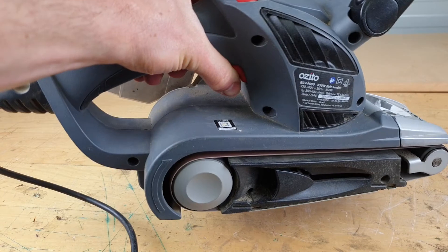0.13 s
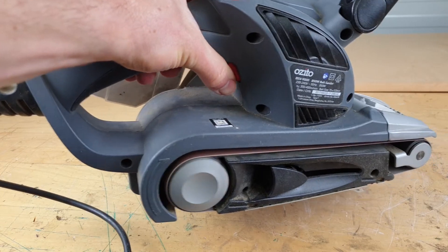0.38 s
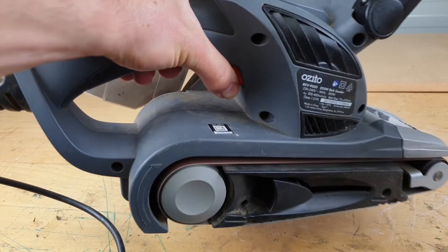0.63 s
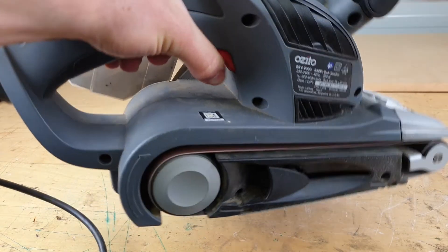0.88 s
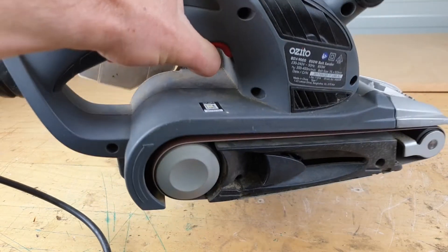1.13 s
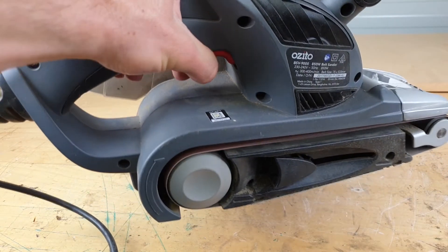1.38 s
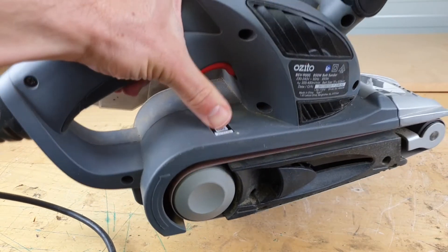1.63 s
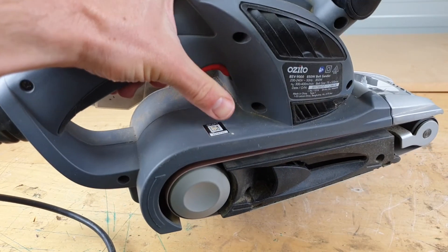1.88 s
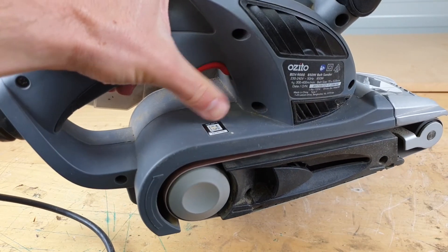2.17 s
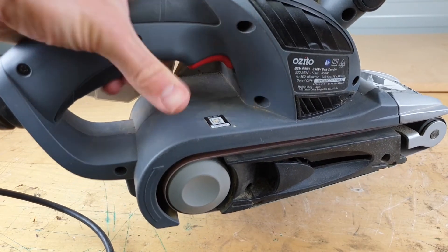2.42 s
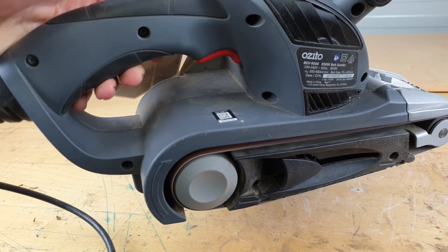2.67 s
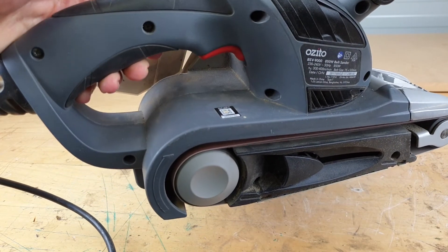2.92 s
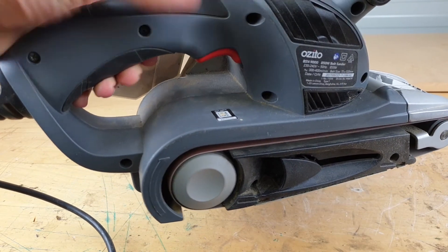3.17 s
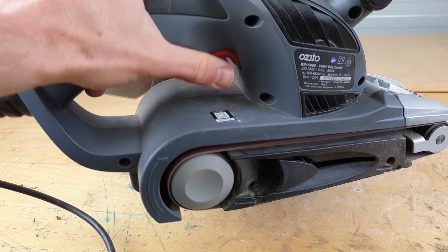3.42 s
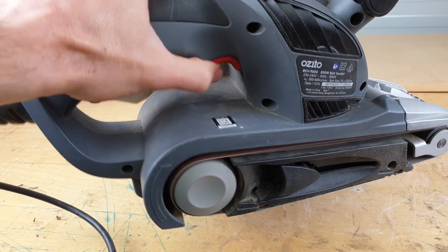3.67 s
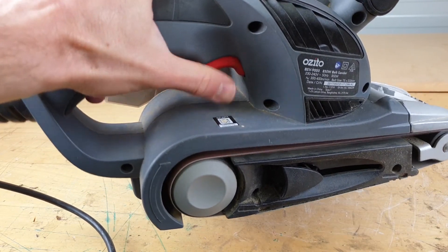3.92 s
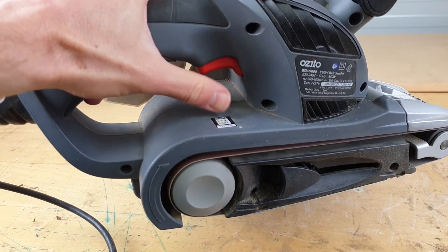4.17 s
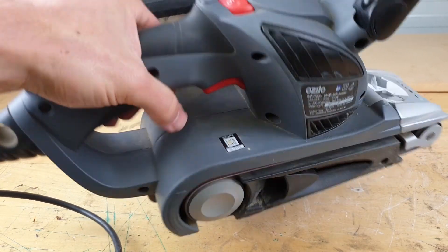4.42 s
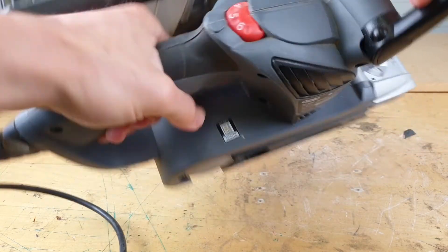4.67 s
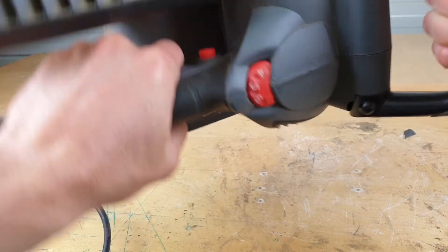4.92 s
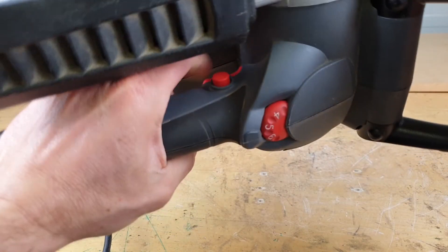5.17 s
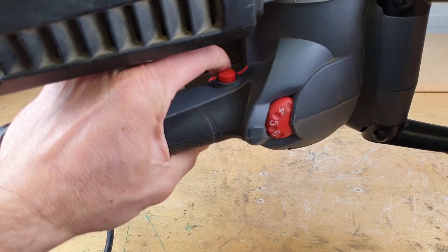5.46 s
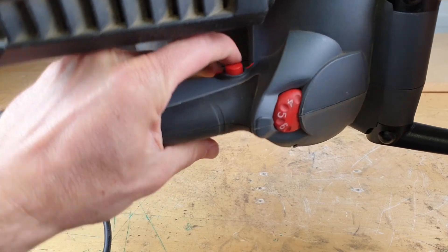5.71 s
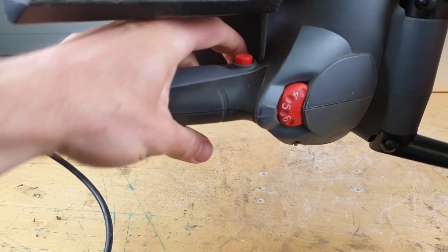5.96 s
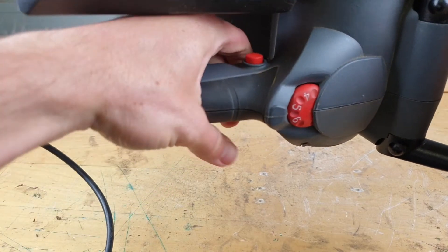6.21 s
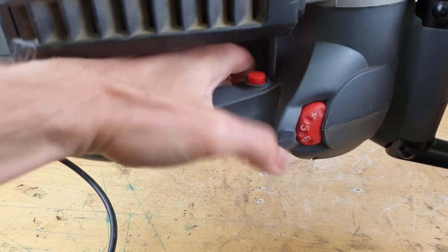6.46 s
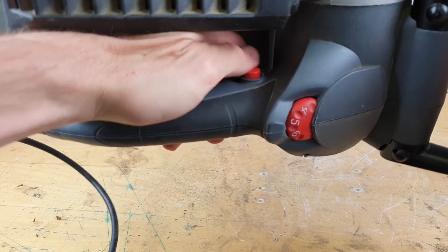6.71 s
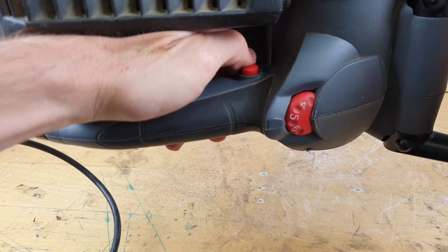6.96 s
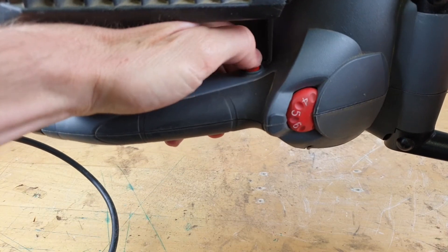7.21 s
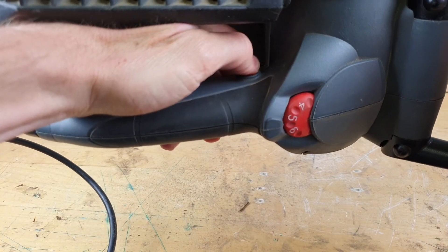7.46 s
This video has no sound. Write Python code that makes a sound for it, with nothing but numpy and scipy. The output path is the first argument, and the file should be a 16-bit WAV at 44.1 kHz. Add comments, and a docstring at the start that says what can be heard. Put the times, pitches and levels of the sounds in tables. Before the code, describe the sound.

A handheld electric belt sander close to the microphone in a quiet workshop. It is already coasting down, rattling lower, with plastic clicks before the trigger restarts it. The motor surges into a bright whine with rushing fan and fluttering belt scrape, runs steadily, then is released and slows to a rattling stop as it is turned over. After a tiny pause it clicks on and whirs up again, brighter and hissier.

```python
"""In a workshop, a belt sander held close to one microphone coasts down, is switched on, is turned over while it
coasts to a stop, and is switched on again. The rotor speed drives it all: a family of sine whines locked to the
turning rotor, filtered noise for bearings and gears rattling in the plastic housing and for the rushing fan, and
a resonant scrape that swells once a lap at the belt joint. Clicks, coil hum and faint room tone complete it."""
import sys
import numpy as np
from scipy import signal
from scipy.fft import rfft, irfft, next_fast_len
from scipy.io import wavfile
from scipy.ndimage import uniform_filter1d

SR = 44100
rng = np.random.default_rng(int(sys.argv[2]) if len(sys.argv) > 2 else 0)


def inscribe(sig):
    """Save sig as 16-bit PCM at rate SR to the path in sys.argv[1].

    A 1-D sig is mono; a 2-D sig holds one channel per row.
    Samples are clipped to [-1, 1] before scaling.
    """
    pcm = np.round(np.clip(np.atleast_2d(sig).T, -1, 1) * 32767)
    wavfile.write(sys.argv[1], SR, pcm.astype(np.int16))


def amplitude_ratio(level_db):
    """Convert a level in decibels to the matching linear amplitude (field) ratio."""
    exponent = np.asarray(level_db, float) / 20
    return 10 ** exponent


N = 334719

FULL_SPEED = 525  # rotor turns per s
# when current flows: on_s, off_s
SWITCHED_ON = [(1.098, 3.93), (6.217, 9)]
# the tool is rolled over: from_s, to_s
ROLL_OVER = (4.2, 5.75)
# coasting: start_s, speed_turns_per_s, bearing_friction_turns_per_s2, air_drag_per_turn
COASTS = [(0, 285, 171.4, .00114), (3.914, 524.4, 166, .00116)]
# spinning up: start_s, top_turns_per_s, initial_turns_per_s, quick_share, quick_s, slow_s (time constants)
SPIN_UPS = [(1.098, 524.5, 65, .409, .0369, .1967), (6.2166, 529.2, 0, .475, .0556, .2024)]

# whines of unbalance and magnetic pull, drive pulley teeth, fan blades and gear mesh: cycles_per_rotor_turn,
# waver_db, waver_s, speed_power (exponent that the level follows)
WHINES = [(1, .6, .03, 1.5), (2, 2, .05, 2), (4, 1.8, .2, 6), (12, 3, .02, 1.6), (10, 2.5, .008, .25),
          (20, 3, .02, 0), (32, 3, .015, 1.4), (2.92, 3, .03, .9), (5.84, 3, .03, .7), (8.75, 2.5, .03, 3),
          (2.38, 4, .02, 0)]
# levels at full speed ahead of the covers, one row per whine:
# powered_on_side_db, powered_turned_over_db, coasting_db, added_at_full_pull_db
WHINE_LEVELS = [(-59.5, -57, -60, 0), (-66, -66, -62, 10), (-62, -74, -76, 0), (-68, -62, -90, 29),
                (-54, -58, -56.5, -5), (-76, -62, -72, -10), (-59, -52, -56, 0), (-71, -68, -64, 28),
                (-66, -64, -66, 0), (-65, -68, -85, 0), (-74, -69, -90, 0)]
# how well the covers radiate a whine: centre_hz, width_hz, lift_db
COVERS = [(150, 200, -25), (290, 50, 10), (525, 60, 7), (640, 60, -6), (800, 200, -2), (1060, 90, 4),
          (1220, 170, 9), (1750, 200, 10), (2110, 120, 5), (2780, 350, 6), (3300, 200, 6), (3800, 200, 4),
          (4250, 250, 8), (4600, 150, -2), (5240, 500, 1), (6600, 1200, 2), (14000, 6000, 2)]
# unloaded teeth make and lose contact: level swing, its pace, and extra phase wander in radians
COAST_PATCHY_DB, COAST_PATCH_S, COAST_SMEAR = 2.5, .07, .25

# relative noise colours ahead of the housing resonances, fast on the side, fast turned over, slow:
# frequency_hz, density_db
COLOUR_FAST_SIDE = [(18, -69), (30, -44), (203, -21), (456, -12.5), (520, -10.5), (592, -12), (1050, -7.5),
                    (1920, -8), (3160, -5), (4810, -7.5), (5340, -6), (11400, -10.5), (15600, -17)]
COLOUR_FAST_TURNED = [(18, -59), (30, -32), (468, -13.5), (520, -16), (592, -11.5), (1270, -7),
                      (2030, -6.5), (3510, -3), (4930, -4.5), (5770, -1), (8110, 2.5), (10500, 4),
                      (15600, 0)]
COLOUR_SLOW = [(18, -58), (30, -30), (308, -8.5), (493, -0.5), (770, 2.5), (949, 2.5), (1050, 4.5),
               (2370, -2), (3160, -3.5), (3510, -4.5), (4220, -2), (9240, -16), (15600, -27)]
# housing resonances: centre_hz, width_hz, on_side_db, turned_over_db
HOUSING = [(100, 25, 5, 2), (140, 25, 4, 3), (200, 30, 8, 5), (760, 80, 4, 3), (1060, 80, 3, 2),
           (1240, 110, 4, 4), (1375, 50, 4, 1), (1780, 90, 4, 4), (3070, 200, 3, 4), (3600, 250, 1, 4),
           (4300, 400, 2, 1), (6350, 400, 1, 3), (8720, 300, 0, 4), (9570, 400, 0, 4), (10500, 300, 1, 5)]
# base noise levels while coasting: speed_turns_per_s, housing_rattle_db, fan_hiss_db
NOISE_BY_SPEED = [(0, -100, -104), (8, -80.5, -95), (38, -65, -77.5), (109, -57, -71), (190, -53, -59),
                  (281, -49, -53.5), (392, -44, -48), (500, -41.5, -43)]
# added by the inrush of current at rest, shrinking towards full speed: rattle_db, hiss_db
NOISE_PULL = (2.5, 3)
# added once the vents face the microphone: rattle_db, hiss_db
NOISE_TURNED = (2.5, 4.5)
RING_DOWN_DB_PER_S = 106  # the noise cannot die faster than the workshop rings

# belt on the platen, facing us: centre_hz, width_hz, level_db
SCRAPE_FACING = [(6250, 1830, -3), (7570, 650, 0.5), (9200, 810, -9.5), (11500, 850, -8),
                 (13700, 1600, -19.5)]
# the same heard from behind: centre_hz, width_hz, level_db
SCRAPE_BEHIND = [(4300, 1300, -4), (6500, 1000, 1.5), (8900, 2400, -2), (12500, 3700, -14)]
# scrape as the joint passes: speed_turns_per_s, level_db
SCRAPE_BY_SPEED = [(0, -100), (25, -71.5), (60, -59.5), (110, -55), (170, -52), (290, -50), (525, -50.5)]
# the belt side swings away from the microphone: from_s, to_s
BELT_SWINGS_AWAY = (4.2, 5)
TURNS_PER_LAP, FIRST_PASS_TURNS = 39.37, 1.5  # rotor turns
# drop between passes, how broad each pass is, and level once swung away
LAP_DEPTH_DB, PASS_BREADTH, SCRAPE_BEHIND_DB = 14.5, 2.4, -5.5

ROOM_TONE_DB = -104
# trigger and belt clicks: start_s, level_db, ring_hz, ring_t60_s, crack_over_ring_db (ahead of its filter)
CLICKS = [(.746, -43, 1260, .05, -18), (.979, -51, 830, 0.057, -40), (1.096, -43, 1470, 0.051, -12),
          (4.853, -56, 2200, .02, 5), (5.756, -50.5, 1047, 0.16, -40), (5.858, -52, 757, 0.12, -40),
          (6.156, -80, 1350, .02, -10), (6.192, -78, 780, .02, 9), (6.216, -55, 780, 0.022, 0.5)]
# the field coils hum at twice the mains: pitch_hz, level_db, added_at_full_pull_db
COIL_HUM = [(101, -86, 14), (199.5, -85, 18)]


def evened(x):
    """Scales to rms 1."""
    return x / np.sqrt(np.mean(x ** 2) + 1e-20)


def drift(seconds):
    """Smoothed noise of rms 1 that wanders at the given pace."""
    size = max(round(seconds * SR), 1)
    return evened(uniform_filter1d(uniform_filter1d(rng.standard_normal(N), size), size))


def read_colour(points, hz):
    """Reads a noise colour in dB on a log-frequency axis."""
    f, db = np.transpose(points)
    return np.interp(np.log(hz + 1), np.log(f + 1), db)


def bumps(hz, peaks):
    """Bell-shaped resonances in dB, summed."""
    return sum(db / (1 + (2 * (hz - f) / width) ** 2) for f, width, db in peaks)


def filtered(x, gain, size):
    """Shapes a sound with a gain per frequency bin and evens it to rms 1."""
    return evened(irfft(rfft(x, size) * gain, size)[:N])


def rotor_speed():
    """Turns per second: friction and air drag slow it, the motor pulls it up in a quick and a slow stage."""
    t, speed = np.arange(N) / SR, np.zeros(N)
    for (s, start, friction, drag), (on, top, low, share, quick, slow) in zip(COASTS, SPIN_UPS):
        # speed lost to friction plus drag times speed squared
        scale = np.sqrt(friction / drag)
        angle = np.arctan(start / scale) - np.sqrt(friction * drag) * (t[t >= s] - s)
        speed[t >= s] = scale * np.tan(np.maximum(angle, 0))
        u = t[t >= on] - on
        missing = share * np.exp(-u / quick) + (1 - share) * np.exp(-u / slow)
        speed[t >= on] = top - (top - low) * missing
    return speed


def powered():
    """1 while current flows, with softened edges."""
    t = np.arange(N) / SR
    return uniform_filter1d(sum(1. * (t > on) * (t < off) for on, off in SWITCHED_ON), 400)


def pull(speed):
    """How hard the motor pulls: 1 under power at rest, 0 at full speed or coasting."""
    return powered() * np.clip(1 - speed / FULL_SPEED, 0, 1)


def turned():
    """0 while the tool lies on its side, 1 once it is rolled over."""
    return np.interp(np.arange(N) / SR, ROLL_OVER, [0, 1])


def whines(speed):
    """Sines locked to the rotor; each wavers and swells as it glides through a resonance of the covers."""
    angle = 2 * np.pi * np.cumsum(speed) / SR
    power, load, over = powered(), pull(speed), turned()
    patchy = np.tanh(drift(COAST_PATCH_S))
    grid, out = np.arange(0, SR / 2, 5.), np.zeros(N)
    covers = amplitude_ratio(bumps(grid, COVERS))
    for (order, waver_db, waver_s, law), levels in zip(WHINES, WHINE_LEVELS):
        side_db, turned_db, off_db, pull_db = levels
        on_db = side_db + over * (turned_db - side_db)
        # each whine takes the patchiness at its own offset
        coast_db = off_db + COAST_PATCHY_DB * np.roll(patchy, round(order * SR / 7))
        db = power * on_db + (1 - power) * coast_db + pull_db * load + waver_db * drift(waver_s)
        level = amplitude_ratio(db) * (speed / FULL_SPEED) ** law * np.interp(order * speed, grid, covers)
        smear = (.2 + COAST_SMEAR * (1 - power)) * np.sqrt(order) * drift(.012)
        out += level * np.sin(order * angle + smear)
    near_rest = np.clip(speed / 42, 0, 1) ** 8  # fades to silence as the rotor stops
    return np.sqrt(2) * near_rest * out


def noise_levels(speed):
    """Rattle and hiss in dB: they follow the speed, the pull of the motor and the side that faces us."""
    turns, *levels = np.transpose(NOISE_BY_SPEED)
    load, over = pull(speed), turned()
    fall = RING_DOWN_DB_PER_S * np.arange(N) / SR
    limited = []
    for db, pull_db, turned_db in zip(levels, NOISE_PULL, NOISE_TURNED):
        wanted = np.interp(speed, turns, db) + pull_db * load + turned_db * over
        limited.append(np.maximum.accumulate(wanted + fall) - fall)
    return limited


def rattle_and_rush(speed):
    """Dense impacts and air noise; the colour brightens and the knocks stand out less as the speed rises."""
    size = next_fast_len(N)
    hz = np.fft.rfftfreq(size, 1 / SR)
    f, width, side_db, turned_db = np.transpose(HOUSING)
    on_side, over = bumps(hz, zip(f, width, side_db)), bumps(hz, zip(f, width, turned_db))
    colours = [read_colour(COLOUR_SLOW, hz) + on_side,
               read_colour(COLOUR_FAST_SIDE, hz) + on_side,
               read_colour(COLOUR_FAST_TURNED, hz) + over]
    fast = np.clip((speed - 120.) / 376.0, 0, 1)
    shares = [1 - fast, fast * (1 - turned()), fast * turned()]
    upper = 1 / (1 + (5600. / (hz + 1)) ** 8)  # rattle lies below 5600 Hz, hiss above
    gritty = 1 + 0.93 * np.exp(-speed / 33.0)  # single knocks stand out near rest
    out = np.zeros(N)
    shared = drift(0.0005)  # knocks shake both bands together
    for band, grain_db, db in zip([1 - upper, upper], [1.1, 1.3], noise_levels(speed)):
        shake_db = gritty * grain_db * shared + 0.38 * drift(0.036)
        shake = rng.standard_normal(N) * amplitude_ratio(shake_db)
        parts = [filtered(shake, np.sqrt(band) * amplitude_ratio(colour), size) for colour in colours]
        out += amplitude_ratio(db) * sum(share * part for share, part in zip(shares, parts))
    return out


def ringing(hz, modes):
    """Gain of modes that alternate in sign, which shapes the valleys between them."""
    return abs(sum((-1) ** k * amplitude_ratio(db) / (1 + 2j * (hz - f) / width)
                   for k, (f, width, db) in enumerate(modes)))


def scrape(speed):
    """Gritty noise through platen modes: the belt rubs hardest as its joint passes, once a lap."""
    size = next_fast_len(N)
    hz = np.fft.rfftfreq(size, 1 / SR)
    grit = rng.standard_normal(N) * amplitude_ratio(2.2 * drift(0.003))
    facing = filtered(grit, ringing(hz, SCRAPE_FACING), size)
    behind = filtered(grit, ringing(hz, SCRAPE_BEHIND), size)
    swung = np.interp(np.arange(N) / SR, BELT_SWINGS_AWAY, [0, 1])
    laps = (np.cumsum(speed) / SR - FIRST_PASS_TURNS) / TURNS_PER_LAP
    away = abs(np.sin(np.pi * laps)) ** PASS_BREADTH  # 0 as the joint passes
    db = np.interp(speed, *np.transpose(SCRAPE_BY_SPEED)) - LAP_DEPTH_DB * away
    return amplitude_ratio(db) * ((1 - swung) * facing + swung * amplitude_ratio(SCRAPE_BEHIND_DB) * behind)


def room_tone():
    """Faint dull noise from a two-pole filter."""
    dull = signal.lfilter([1, -1], [1, -1.75, .78], rng.standard_normal(N))
    return amplitude_ratio(ROOM_TONE_DB) * evened(dull)


def clicks():
    """Trigger and belt: a short noise crack with a decaying sine as the plastic ring."""
    out, t = np.zeros(N), np.arange(5000) / SR
    for s, db, hz, t60, crack_db in CLICKS:
        noise = signal.lfilter([1, 0, -1], [1, -.9, .3], rng.standard_normal(len(t)))
        crack = amplitude_ratio(crack_db - 60 * t / 0.013) * noise
        swell = 1 - np.exp(-t / 0.00051)
        ring = amplitude_ratio(-60 * t / max(t60, .002)) * swell * np.sin(2 * np.pi * hz * t)
        out[round(s * SR):][:len(t)] += amplitude_ratio(db) * (crack + ring)
    return out


def hum(speed):
    """The windings hum while current flows, loudest as the motor pulls up to speed."""
    t, unsteady_db, load = np.arange(N) / SR, 2.3 * drift(.03), pull(speed)
    tones = sum(amplitude_ratio(db + pull_db * load + unsteady_db) * np.sin(2 * np.pi * hz * t)
                for hz, db, pull_db in COIL_HUM)
    return powered() * tones


def scene():
    """One microphone feeds both channels."""
    speed = rotor_speed()
    machine = whines(speed) + rattle_and_rush(speed) + scrape(speed)
    mix = machine + room_tone() + clicks() + hum(speed)
    return np.array([mix, mix])


def top_cut(x):
    """Nothing passes above the cut-off."""
    return signal.sosfilt(signal.butter(12, 16200, fs=SR, output="sos"), x)


def record(dry):
    """A steep low-pass at 15750 Hz limits the band of the finished mix."""
    low_pass = signal.firwin(511, 15750, window=("kaiser", 9), fs=SR)
    limited = signal.oaconvolve(dry, low_pass[None], "same")
    return top_cut(limited)


dry = scene()
out = record(dry)
inscribe(out)
```